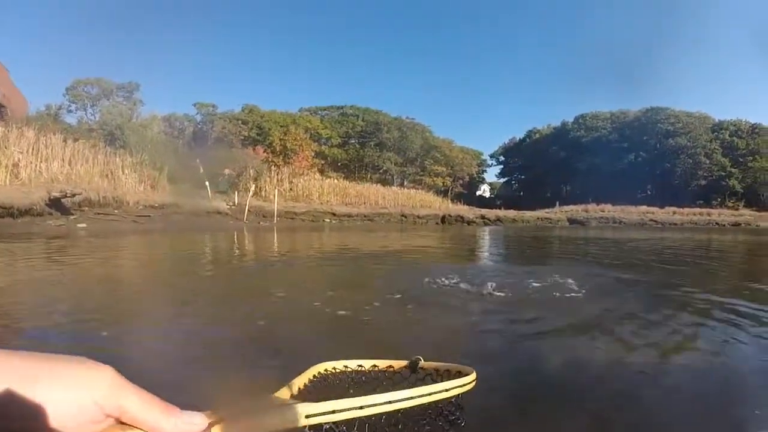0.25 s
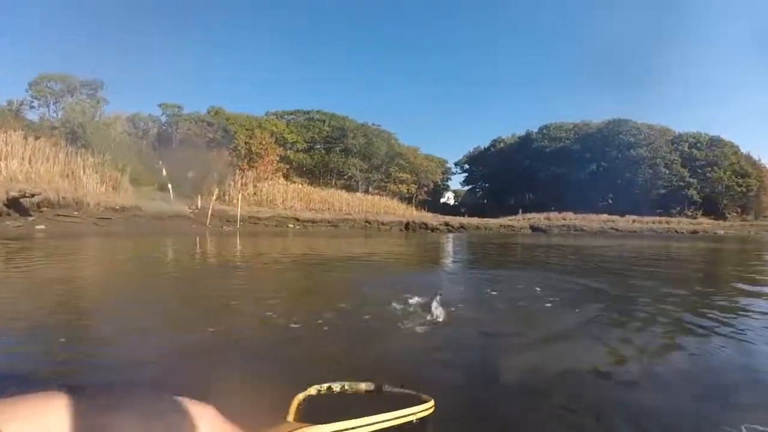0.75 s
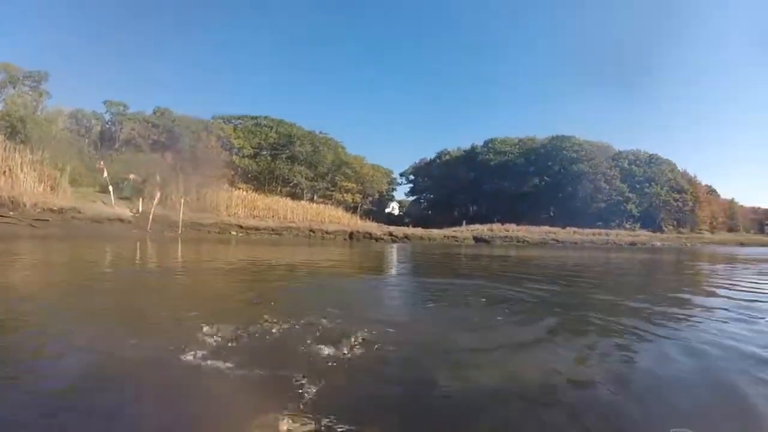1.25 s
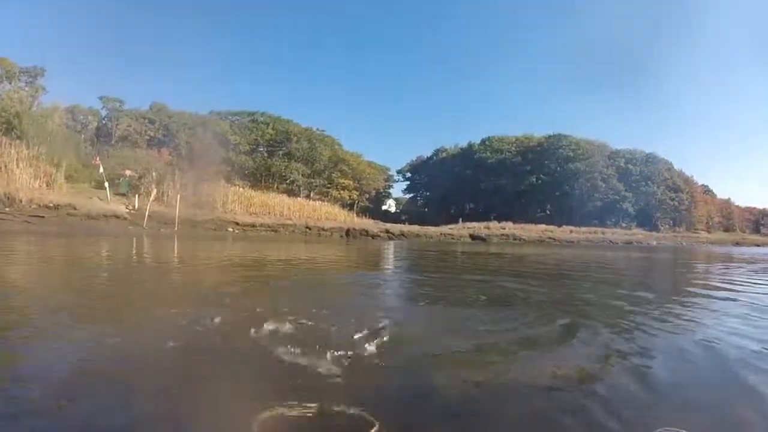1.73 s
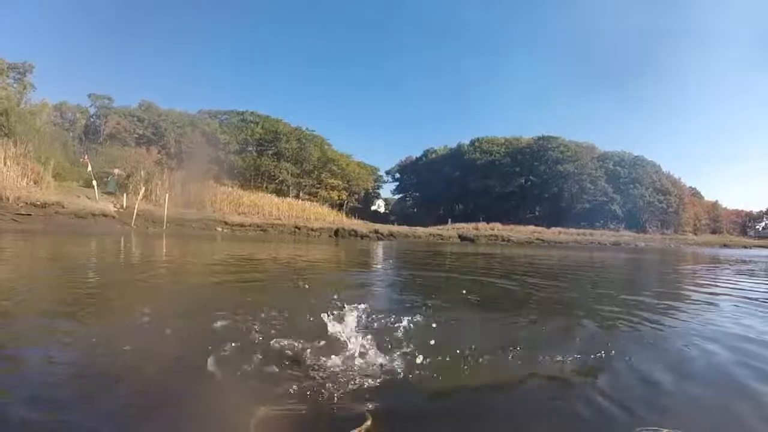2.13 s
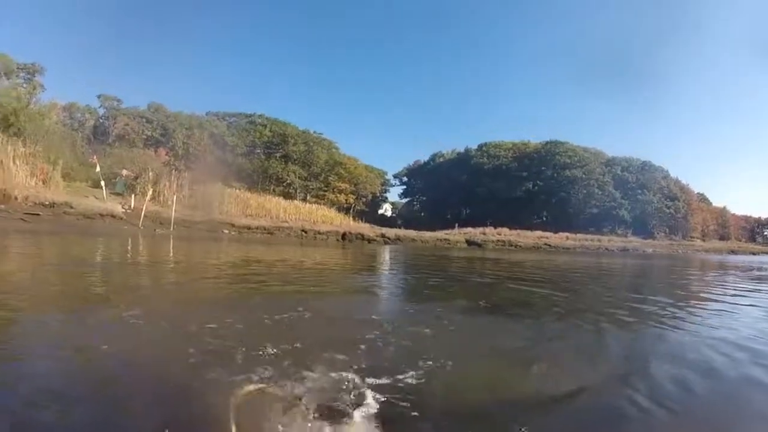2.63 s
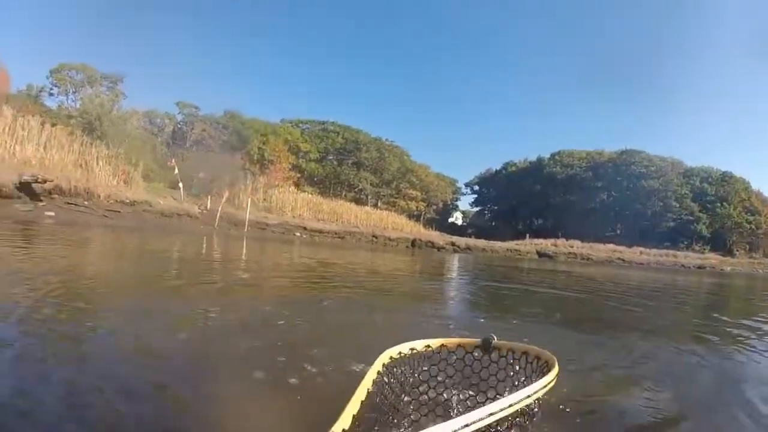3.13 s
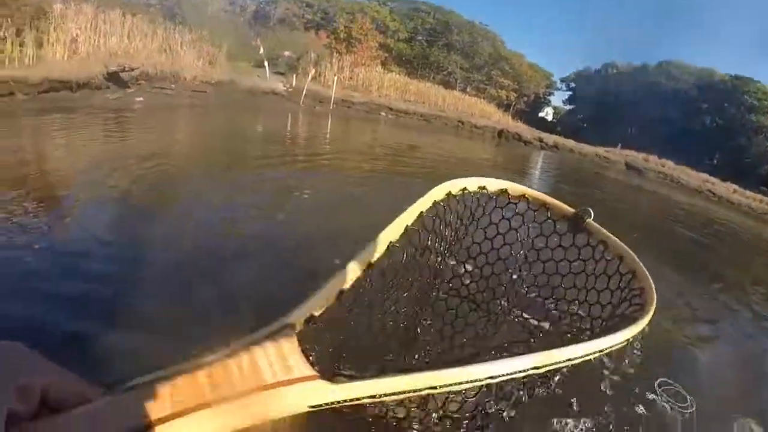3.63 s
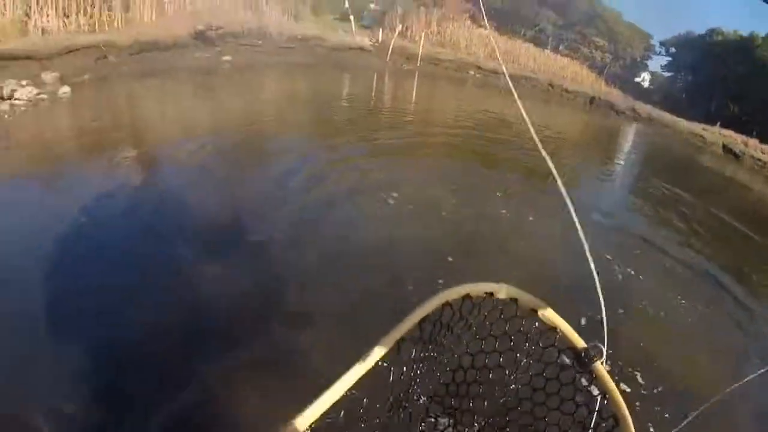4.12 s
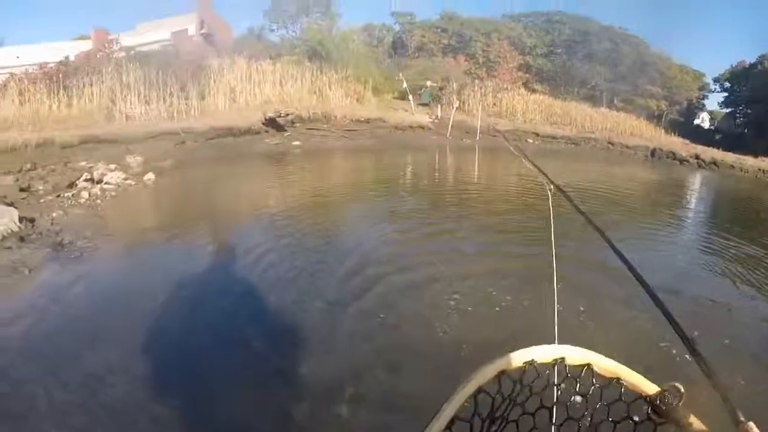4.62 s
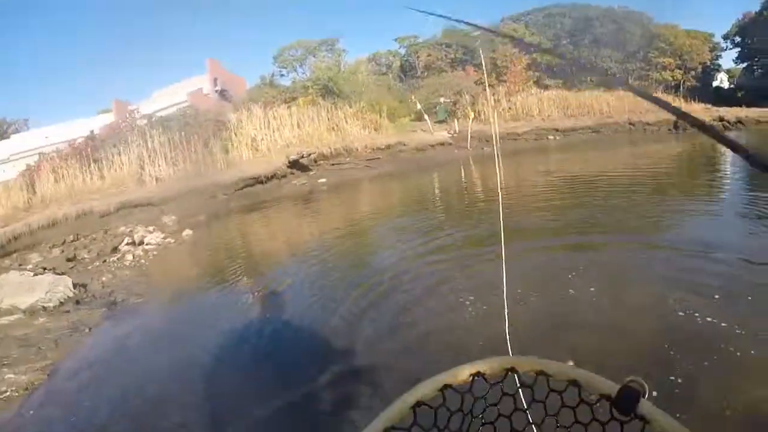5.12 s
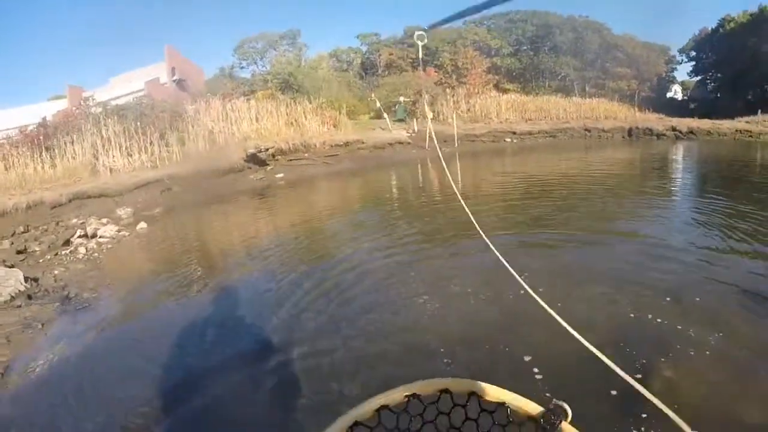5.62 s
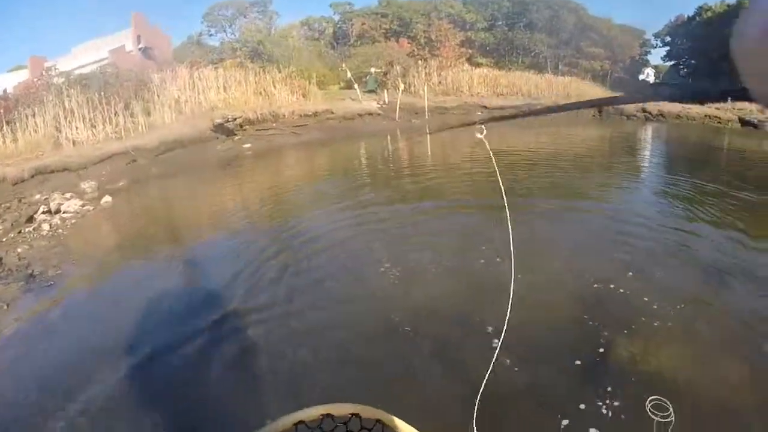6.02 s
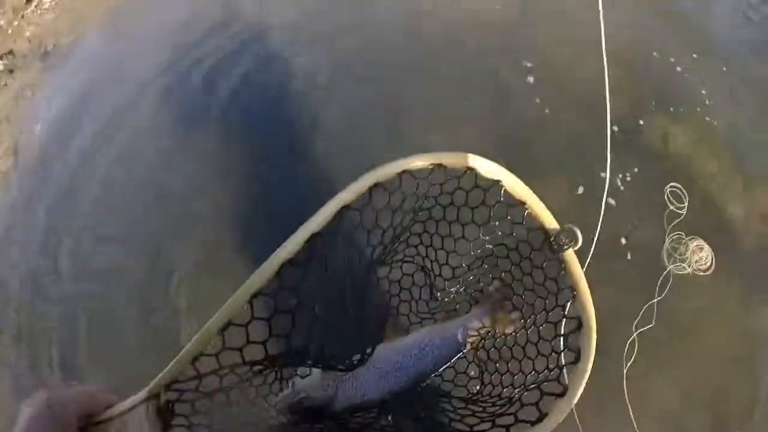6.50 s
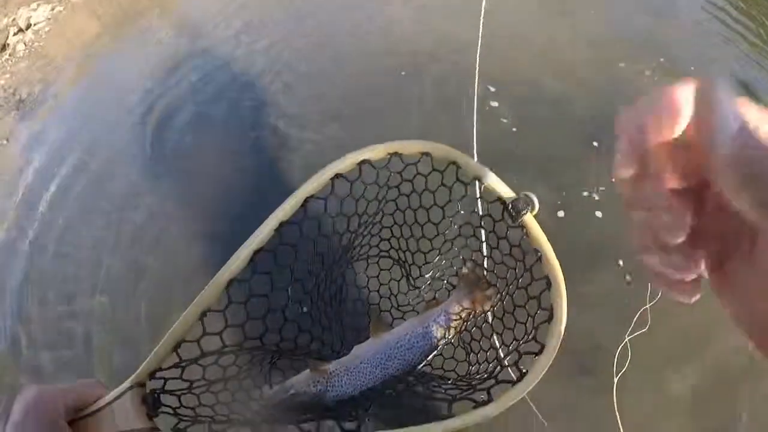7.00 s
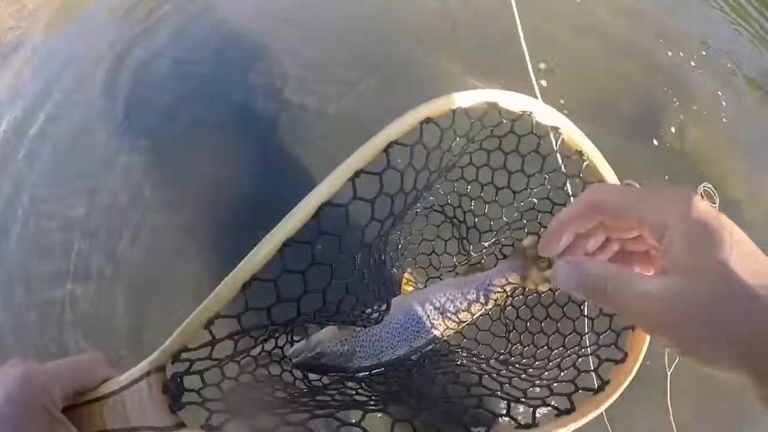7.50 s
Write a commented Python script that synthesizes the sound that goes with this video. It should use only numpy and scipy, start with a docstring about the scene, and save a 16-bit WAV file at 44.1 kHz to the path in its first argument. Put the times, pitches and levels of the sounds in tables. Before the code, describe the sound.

Close, boxy and muffled sound from a camera case worn on the body. Short scrapes and bursts of splashing come first, with droplets and hollow bubbles, peaking in a sharp harsh slap. Heavier rustling and low bumps follow, then thinner rubbing. A cluster of loud, clipped plastic cracks and deep jolts comes late, with brief metallic ringing, before everything drops to soft handling noise and a faint hiss.

```python
"""Hooked fish thrashing by a camera in a case

A hooked fish thrashes in shallow water and is netted, heard by a body-worn camera in a plastic case.
Splashes and rubbing straps are random grains that ring the resonances of the case; drops are short sine plips.
Hard knocks late on drive the same resonances and overload the microphone; a metal latch rings after them.
Jolts are low damped waves. Wind and body movement are shaped low noise underneath."""
import sys
import numpy as np
from scipy import signal
from scipy.fft import rfft, irfft
from scipy.io import wavfile

SR = 44100
rng = np.random.default_rng(int(sys.argv[2]) if len(sys.argv) > 2 else 0)


def digitize_waveform(pressure):
    """Quantize a signal to 16-bit integers and store it at the path in sys.argv[1].

    Rows of a 2-D input are taken as channels; values are limited to [-1, 1].
    """
    field = np.atleast_2d(pressure).T
    bounded = np.clip(field, -1, 1)
    quanta = np.round(bounded * 32767).astype(np.int16)
    wavfile.write(sys.argv[1], SR, quanta)


def amplitude_ratio(level_db):
    """Convert a level in decibels to the matching linear amplitude (field) ratio."""
    exponent = np.asarray(level_db, float) / 20
    return 10 ** exponent


N = 341775  # length of the scene in samples


def rms_one(x):
    """Scales a sound to unit rms."""
    return x / np.sqrt(np.mean(x ** 2) + 1e-20)


def drift(rate_hz):
    """Slow random wandering with spread 1: noise smoothed by a double low-pass, made at SR / 20."""
    r = np.exp(-40 * np.pi * rate_hz / SR)
    noise = rng.standard_normal(N // 20 + 2002)
    slow = signal.lfilter([1], [1, -2 * r, r * r], noise)[2000:]  # skip the settling
    return np.interp(np.arange(N) / 20, np.arange(len(slow)), rms_one(slow))


def resonance(x, hz, width):
    """Two-pole resonance, width in Hz, with gain about 1 on top."""
    r = np.exp(-np.pi * width / SR)
    top = np.array([1, 0, -1]) * (1 - r * r) / 2
    bottom = [1, -2 * r * np.cos(2 * np.pi * hz / SR), r * r]
    return signal.lfilter(top, bottom, x)


def low_pass(x, order, hz):
    """Takes away what lies above hz; a higher order cuts more steeply."""
    return signal.sosfilt(signal.butter(order, hz, fs=SR, output="sos"), x)


def ringing(hz, t60):
    """A sine that starts at height 1 and dies by 60 dB in t60 seconds."""
    t = np.arange(int(t60 * SR)) / SR
    return np.sin(2 * np.pi * hz * t) * amplitude_ratio(-60 * t / t60)


def add(out, s, sound):
    """Mixes a sound in at s seconds."""
    at = round(s * SR)
    out[at:at + len(sound)] += sound[:N - at]


def grains(per_s, spread_db):
    """Random clicks of uneven size and either sign, scaled to unit rms."""
    sizes = amplitude_ratio(spread_db * np.minimum(rng.exponential(1, N), 5)) * rng.choice([-1, 1], N)
    happens = rng.random(N) < per_s / SR
    return rms_one(sizes * happens)


def swells(bed_db, s, peak_db, rise_s, fall_s):
    """Level in dB of a background bed plus swells that rise to a peak and fall; their powers add."""
    roundness = 0.85  # 1: even fall in dB; less: sharper top and flatter feet
    t = np.arange(0, N, 32)
    late = t / SR - s[:, None]
    away = np.where(late < 0, -late / rise_s[:, None], late / fall_s[:, None])  # 1 is 20 dB down
    swell_db = peak_db[:, None] - 20 * away ** roundness
    power = amplitude_ratio(2 * bed_db[t]) + np.sum(amplitude_ratio(2 * swell_db), axis=0)
    return np.interp(np.arange(N), t, 10 * np.log10(power))


# background level of rub, spray and rumble; it sinks after the hard knocks, then recovers:
# (t/s, rub level/dB, spray level/dB, deep rumble level/dB, upper rumble level/dB)
BACKGROUND_LEVELS = [(0.0, -64.5, -63.5, -55, -64), (0.2, -63, -63, -64, -56.5),
                     (0.9, -62.5, -63, -41, -53), (1.5, -62, -63.5, -45, -57.5), (2.4, -59, -59, -49, -48),
                     (3.05, -59, -57.5, -53, -56.5), (3.3, -52, -59.5, -35.5, -44.5),
                     (4.0, -51, -55, -31, -37), (4.25, -50, -58, -28, -45),
                     (4.55, -77.5, -62.5, -37.5, -46), (5.4, -59.5, -59, -45.5, -60),
                     (5.92, -56.5, -64.5, -39, -45), (5.99, -65, -81.5, -35.5, -49),
                     (6.29, -65.5, -86, -39, -50), (6.5, -65, -86, -41, -60.5),
                     (6.78, -83, -85, -73, -72.5), (7.25, -72, -70, -64.5, -62.5),
                     (7.55, -67, -67, -46.5, -74), (7.75, -59, -59.5, -44, -38)]


def background_levels():
    """The four background levels, drawn as straight lines from point to point, sample by sample."""
    s, *columns = np.transpose(BACKGROUND_LEVELS)
    return [np.interp(np.arange(N) / SR, s, column) for column in columns]


# resonances of the case, before each sound sets its own tilt and widening:
# (f/Hz, basic width/Hz, relative level/dB)
CASE_MODES = [(390, 266, -0.5), (750, 133, 0.5), (957, 166, -1.5), (1388, 277, -0.5), (2044, 261, -3),
              (2471, 355, -4.5), (2955, 210, -10), (3360, 480, -17.5), (4360, 730, -19.5), (5725, 770, -23),
              (7370, 1100, -32.5), (8600, 700, -42.5), (9300, 1100, -40), (12000, 4700, -51)]


def through_case(force, modes, tilt_db):
    """A force rings steep-sided case resonances, each wavering a little; unit rms in, about unit rms out."""
    out, passed = np.zeros(N), 0
    for k, (hz, width, mode_db) in enumerate(modes):
        level_db = mode_db + tilt_db * np.log2(hz / 2000)  # tilt in dB per octave
        passed += amplitude_ratio(2 * level_db) * np.pi * width / SR
        once = resonance(force, hz, 1.25 * width)
        twice = resonance(once, hz, 1.25 * width)  # two in a row give steep sides
        out += (-1) ** k * amplitude_ratio(level_db + 1.8 * drift(6)) * twice
    return out / np.sqrt(passed)


# rubs and splashes, as peak levels of the driving grains; rise and fall are times over 20 dB:
# (t/s of peak, rub level/dB, dull part level/dB relative to rub, spray level/dB, rise/s, fall/s)
RUBS_AND_SPLASHES = [(.42, -43, -3.5, -70, 0.19, 0.19), (.51, -37, -3, -67, 0.041, 0.045),
                     (0.611, -35, 1.5, -60, 0.064, 0.095), (.70, -36, 4.5, -60, 0.13, 0.043),
                     (.84, -54, -0.5, -63, 0.41, 0.27), (1.05, -53, 4.5, -62, 0.055, 0.27),
                     (1.27, -51.5, -0.5, -53.5, .35, 0.22), (1.437, -51, 1, -52.5, 0.021, .06),
                     (1.558, -60, -11, -56.5, 0.011, 0.32), (1.811, -55.5, 5, -47, 0.066, .03),
                     (1.86, -57, 9, -58, .03, 0.18), (2.01, -41, -5.5, -46, 0.056, 0.16),
                     (2.164, -51, 3, -53.5, 0.29, 0.23), (2.568, -50.5, 1.5, -57, 0.25, 0.015),
                     (2.628, -42, 0.5, -52.5, 0.037, 0.33), (2.718, -23, -9.5, -46, 0.042, 0.096),
                     (2.75, -25, -11, -55, 0.061, 0.048), (2.845, -45, -5, -62, 0.13, 0.015),
                     (2.977, -36.5, 1.5, -55, 0.04, 0.014), (3.146, -45, -24, -55, 0.015, 0.084),
                     (3.4, -41.5, -4, -74, 0.19, 0.046), (3.498, -30.5, -3, -62, 0.018, 0.0092),
                     (3.56, -36, -4, -55, 0.1, 0.19), (3.77, -32, -6, -45, .3, 0.19),
                     (3.89, -34.5, -0.5, -46, 0.2, 0.14), (4.244, -53.5, -11, -64, 0.032, 0.87),
                     (4.35, -32, -1, -50, .2, 0.17), (4.44, -34, -5, -48, 0.29, 0.061),
                     (4.711, -56.5, 11.5, -51.5, 0.11, 0.027), (4.78, -45, 2.3, -57, 0.03, 0.1),
                     (5.022, -43.5, 1.5, -49, 0.14, 0.04), (5.078, -47.5, 1.5, -53.5, 0.075, 0.26),
                     (5.5, -38, -3.5, -52.5, 0.052, 0.095), (5.6, -45, -6, -48.5, 0.031, 0.088),
                     (5.638, -50, -9, -49.5, 0.056, 0.016), (5.738, -51.5, -7, -54, 0.12, 0.064),
                     (5.828, -49, -6.5, -53.5, 0.032, 0.22), (6.078, -39.5, -20, -52, 0.032, 0.019),
                     (6.178, -43.5, -2.5, -50.5, 0.31, 0.066), (6.265, -43.5, 1.5, -57, 0.12, 0.022),
                     (6.363, -49, 3.5, -54.5, .12, 0.066), (6.408, -45.5, -1.5, -48.5, 0.012, 0.014),
                     (6.569, -44, -7.5, -52.5, .034, 0.13), (6.67, -50.5, 2, -56.5, 0.056, 0.038),
                     (7.266, -56, -8, -70, 0.019, .021), (7.306, -56, -4, -65, 0.037, 0.034),
                     (7.383, -51.5, -2.5, -64, .013, .03), (7.442, -57, 0.5, -60.5, 0.079, 0.072),
                     (7.567, -55.5, 8.5, -74, 0.038, .021), (7.708, -62, -3, -50, .005, 0.018)]


def rubs_and_splashes():
    """Rubs and splashes swell over a faint, changing background of rubbing and spray, and set the level of the
    droplets too."""
    bed_rub_db, bed_spray_db, _, _ = background_levels()
    s, peak_db, dull_db, spray_peak_db, rise, fall = np.transpose(RUBS_AND_SPLASHES)
    rub_db = swells(bed_rub_db, s, peak_db, rise, fall)
    bed_dull_db = bed_rub_db + 3  # the faint rubbing has a stronger dull part
    dull_re_rub_db = swells(bed_dull_db, s, peak_db + dull_db, rise, fall) - rub_db
    spray_db = swells(bed_spray_db, s, spray_peak_db, rise, fall)
    return rub(rub_db, dull_re_rub_db) + spray(spray_db) + droplets(spray_db, rub_db)


# slips and slaps within the rub, as strength of the driving grains; they die to 1/e in the decay time:
# (t/s, starting level/dB, decay/ms)
RUB_SLIPS = [(0.5553, -31.5, 5.5), (0.665, -37.5, 8.7), (0.732, -45, 2.4), (1.233, -53, 3.3),
             (1.6, -48, 2.3), (1.652, -63, 2.6), (2.336, -66, 2.3), (2.224, -49, 2.8), (2.567, -45, 4.2),
             (2.941, -44, 6), (2.8035, -41, 15), (3.1384, -50, 6.4), (3.245, -49, 10), (3.495, -42, 8.5),
             (4.0438, -29.5, 1.8), (4.1, -40, 4.4), (4.2299, -39, 12), (4.298, -34, 4), (4.339, -54, 9.1),
             (5.2741, -43, 3.2), (6.895, -62, 2.8), (7.008, -62, 6)]


def rub(level_db, dull_db):
    """Dense grains of straps rubbing shake the case; the dull level sets the share of its low resonances."""
    strength = amplitude_ratio(level_db + 2.0 * drift(18) + 1.3 * drift(100))
    t = np.arange(1500) / SR
    for s, db, ms in RUB_SLIPS:  # a slip is a sudden burst of the same grains
        add(strength, s, amplitude_ratio(db) * np.exp(-1000 * t / ms))
    force = grains(5000, spread_db=3.0) * strength
    upper = low_pass(through_case(force, CASE_MODES[4:], tilt_db=-6.0), 2, 6000)
    dull = through_case(force * amplitude_ratio(dull_db), CASE_MODES[:4], tilt_db=0.8)
    return upper + dull


def spray(level_db):
    """Fine bright grains of falling water, coloured by the upper resonances of the case."""
    force = grains(2000, spread_db=1.5) * amplitude_ratio(level_db + 2.2 * drift(50))
    return through_case(force, CASE_MODES[5:], tilt_db=8.0)


def plip(hz, cycles, rise):
    """A bubble swells in about a cycle, rings on unevenly and rises in pitch; peak about 1."""
    turns = np.arange(int(cycles * SR / hz)) * hz / SR
    uneven = 1 + 0.68 * np.interp(turns / 2.8, np.arange(30), rng.standard_normal(30))
    envelope = (1 - np.exp(-turns / 1.3)) * amplitude_ratio(-40 * turns / cycles)
    wave = envelope * np.sin(2 * np.pi * turns * (1 + rise * turns))
    return wave * uneven / np.max(np.abs(wave))


# single droplets: (t/s, approximate peak level/dB, starting f/Hz)
SMALL_DROPS = [(0.604, -36.5, 4340), (0.8576, -42.5, 6020), (1.0974, -47.5, 3900), (1.235, -38, 6000),
               (1.792, -51, 6060), (1.8123, -46, 6100), (1.9165, -49, 5930), (1.9654, -46, 6100),
               (1.9954, -45, 6100), (2.062, -41, 6000), (2.167, -49, 5940), (2.2618, -48, 6100),
               (2.3528, -46, 5980), (2.604, -45, 5660), (2.8035, -42, 4360), (2.8459, -43.5, 5900),
               (2.9272, -57, 3840), (3.026, -48, 5870), (3.196, -41.5, 8550), (3.6227, -43.5, 4270),
               (3.7075, -42, 4350), (3.7883, -35, 5860), (3.9352, -29, 5920), (4.163, -38, 5730),
               (4.2971, -44, 3460)]
# one bubble near the surface, rising fast: (t/s, approximate peak level/dB, starting f/Hz)
SURFACE_PLOP = (2.868, -40, 950)
# larger bubbles: (t/s, approximate peak level/dB, starting f/Hz)
LARGE_BUBBLES = [(1.234, -39.5, 2630), (1.437, -39.5, 2190), (1.563, -46, 1420), (1.654, -48, 2700),
                 (1.716, -40, 2410), (1.798, -40, 1390), (1.856, -36.5, 2340), (1.919, -43, 1440),
                 (2.226, -38.5, 2590), (2.265, -39, 2460), (2.399, -40, 1440), (2.567, -34.5, 2960),
                 (2.598, -46.5, 2390), (2.803, -29, 2440), (2.948, -34, 2000), (3.139, -41.5, 1020),
                 (4.044, -39, 1086), (4.097, -43, 1390), (4.228, -30, 1980), (5.08, -34, 1870),
                 (7.709, -39, 1390)]


def droplets(spray_db, rub_db):
    """Listed drops and bubbles ring as plips, over a patter of small ones that follows the spray and rub levels."""
    out = np.zeros(N)
    for s, db, hz in SMALL_DROPS:
        add(out, s, amplitude_ratio(db) * plip(hz, cycles=48.0, rise=0.00052))
    s, db, hz = SURFACE_PLOP
    add(out, s, amplitude_ratio(db) * plip(hz, cycles=39.0, rise=0.0127))
    for s, db, hz in LARGE_BUBBLES:
        add(out, s, amplitude_ratio(db) * plip(hz, cycles=38.0, rise=0.0019))
    for when, pitch, size in rng.random((900, 3)):  # patter as loud as the spray allows
        s = when * (N - 1) / SR
        db = spray_db[int(s * SR)] + 5.0 - 12.0 * size
        add(out, s, amplitude_ratio(db) * plip(800 * 12.0 ** pitch, cycles=19.0, rise=0.0039))
    for when, pitch, size in rng.random((500, 3)):  # patter as loud as the rub allows
        s = when * (N - 1) / SR
        db = rub_db[int(s * SR)] + 4.5 - 13.0 * size
        add(out, s, amplitude_ratio(db) * plip(1200 * 2.4 ** pitch, cycles=28.0, rise=0.0033))
    ticks = np.zeros(N)  # each listed drop and larger bubble starts with a tick
    for s, db, _ in SMALL_DROPS + LARGE_BUBBLES:
        ticks[round(s * SR)] = amplitude_ratio(db)
    return out + resonance(ticks, 3500, 5000)


# knocks on the case; hardness tilts the resonances about 2000 Hz, rattle is the share of noise in the contact:
# (t/s, peak level/dB, favoured f/Hz, contact/ms, hardness/dB per octave, rattle/0 to 1)
CASE_KNOCKS = [(5.5141, -1.5, 617, 3.64, -1, 0.42), (5.5159, -8.5, 1950, 3, 11.5, 0),
               (5.640, -23, 2020, 2.2, -2, 0.56), (5.941, -19.5, 2000, 2.7, 0, 0.76),
               (5.947, -19.5, 4210, 21.7, 1.5, 0.7), (6.0069, -8, 2160, 6.5, -4, 0.96),
               (6.0088, -8, 1370, 3.04, 5, 0.97), (6.051, -23, 2370, 0.51, 12.5, 0.2),
               (6.060, -25, 2300, 1.3, 5.5, 0.74), (6.070, -23, 2280, 1.4, 6.5, 0.85),
               (6.0744, -14, 2760, 1.34, 0.5, 0.5), (6.2217, 6, 2400, 1.6, 4.5, 0.78),
               (6.2233, 0, 1480, 1.8, 8, 0.15), (6.311, -32, 1035, 2, 2, 0.45),
               (6.3995, -15.5, 800, 1.35, 12, 0.9), (6.4003, -5.5, 1470, 1.62, 3, 0.21),
               (6.459, 2.5, 2690, 1.07, 7, 0.69), (6.462, -12.5, 1500, 0.45, 6, 0.4),
               (6.567, -42, 1500, 2.3, 6, 0), (6.686, 0, 2220, 1.6, 10.5, 0.38)]


def knocks():
    """A rattling contact drives the case, with extra weight near the struck spot's own pitch."""
    out = np.zeros(N)
    t = np.arange(3000) / SR
    for s, db, spot_hz, ms, hardness_db, rattle in CASE_KNOCKS:
        # firm contact, then a short and a faint longer tail
        contact = (t < ms / 1000) + 0.5 * np.exp(-t / 0.00032) + amplitude_ratio(-29) * np.exp(-t / 0.0024)
        noise = rng.standard_normal(3000)
        tone = np.exp(-t / 0.006) * np.sin(2 * np.pi * spot_hz * t)
        force = contact * (rattle * noise + (1 - rattle) * tone)
        blow = amplitude_ratio(-10) * resonance(force, spot_hz, 600)
        for k, (hz, width, mode_db) in enumerate(CASE_MODES):
            level_db = mode_db + hardness_db * np.log2(hz / 2000)
            blow += (-1) ** k * amplitude_ratio(level_db) * resonance(force, hz, width)
        blow = low_pass(blow, 2, 9500)  # the case wall dulls the top
        add(out, s, amplitude_ratio(db) * blow / np.max(np.abs(blow)))
    return out


# modes of the metal latch, before each hit sets its level and damping:
# (f/Hz, relative level/dB, undamped t60/s)
LATCH_MODES = [(1797, -6.5, 0.53), (1850, -1.5, 0.73), (2585, -5.5, 0.17), (2970, -29.5, 0.18)]
# knocks that set the latch ringing; tilt turns about 1850 Hz, damping divides t60:
# (t/s, level/dB, tilt/dB per octave, damping factor)
LATCH_STRIKES = [(5.515, -40.5, -1, 1.1), (6.008, -46, 0.5, 1.9), (6.223, -38, -8.5, 1.8),
                 (6.401, -47.5, 6, 2.9), (6.459, -44, 16, 1.3), (6.689, -38, 14, 2.73)]


def latch():
    """The metal latch rings on after hard knocks as dying sines; two close modes beat."""
    out = np.zeros(N)
    for s, db, tilt_db, damping in LATCH_STRIKES:
        for hz, mode_db, t60 in LATCH_MODES:
            level_db = db + mode_db + tilt_db * np.log2(hz / 1850)
            add(out, s, amplitude_ratio(level_db) * ringing(hz, t60 / damping))
    return out


# jolts of the whole camera, peak before the start is rounded; f is negative when the camera is pulled:
# (t/s, peak level/dB, swing f/Hz, t60/s)
CAMERA_JOLTS = [(0.258, -25.5, 36.5, 0.25), (1.746, -23.5, 43, 0.072), (1.702, -31, 205, 0.027),
                (2.706, -23.5, 257, 0.12), (2.735, -48, 292, 0.089), (3.235, -21, 56, 0.048),
                (3.491, -23, 50, 0.17), (3.699, -14, 108, 0.035), (4.099, -16.5, 93, 0.034),
                (4.154, -21, 252, .03), (4.202, -18, 200, 0.0087), (4.408, -16.5, 137.5, 0.087),
                (4.775, -25.5, 55, 0.15), (4.97, -31, 43, 0.46), (5.273, -19, 105, 0.012),
                (5.342, -26, 108.5, 0.091), (5.5146, -1, 277, 0.041), (5.524, -12, 136, 0.04),
                (5.9425, -9, -110, 0.024), (5.9446, 3, 79, 0.03), (5.963, -7, 110, 0.047),
                (6.007, -5.5, 57, 0.05), (6.2235, -4, 45, 0.0073), (6.281, -10.5, 82, 0.046),
                (6.399, 3.5, 48, 0.0071), (6.427, -18.5, 107, 0.069), (6.6873, -9.5, 60, 0.006),
                (7.058, -39.5, 60.5, 0.048), (7.354, -36, 46, 0.058), (7.435, -31, 44, 0.066),
                (7.557, -29, 120, 0.02)]


def jolts():
    """The camera is pushed and swings back: a low damped wave, its start rounded by a low-pass."""
    out = np.zeros(N)
    for s, db, hz, t60 in CAMERA_JOLTS:
        swing = ringing(hz, t60)
        add(out, s, amplitude_ratio(db) * swing / np.max(np.abs(swing)))
    return low_pass(out, 2, 900)


# gusts and body movements; rise and fall are times over 20 dB:
# (t/s of peak, deep rumble level/dB, upper rumble level/dB, rise/s, fall/s)
GUSTS_AND_MOVES = [(.26, -32, -62, 0.096, .1), (.4, -58, -42.5, 0.14, 0.2), (.54, -36.5, -43, .13, 0.34),
                   (.73, -57, -35.5, 0.36, 0.085), (.9, -34.5, -51, 0.26, 0.091),
                   (1.07, -38.5, -42, 0.15, 0.82), (1.49, -37, -54, .2, 0.079),
                   (1.75, -41.5, -47.5, 0.13, 0.59), (2.06, -38, -37, 0.11, 0.38),
                   (2.23, -31.5, -59, 0.37, 0.029), (2.33, -31, -86, 0.06, 0.23),
                   (2.58, -34, -41.5, 0.091, 0.43), (2.73, -25, -41, .1, 0.21),
                   (2.958, -27.5, -44.5, 0.15, 0.095), (3.12, -32, -54, 0.11, 0.39),
                   (3.27, -35, -39.5, 0.22, 0.42), (3.71, -26, -32, 0.03, 0.26),
                   (3.84, -43, -35, 0.13, 0.42), (3.97, -23, -38, 0.26, 0.32),
                   (4.428, -24, -21.5, 0.22, 0.049), (4.8, -35, -41, .4, 0.074),
                   (4.99, -18.5, -35.5, 0.22, 0.43), (5.42, -28, -47, 0.25, 0.08),
                   (5.57, -33, -35, .15, 0.27), (5.67, -26.5, -49.5, 0.16, .15),
                   (6.04, -27.5, -32.5, 0.16, 0.039), (6.078, -19, -49.5, 0.13, 0.088),
                   (6.171, -25.5, -34, .2, 0.12), (6.326, -27, -43.5, .07, .03),
                   (6.37, -37.5, -44.5, 0.037, 0.24), (6.59, -37, -57.5, 0.073, 0.38),
                   (7.08, -54.5, -55, 0.048, .07), (7.27, -44, -62, 0.19, 0.26),
                   (7.37, -48.5, -46.5, 0.11, .3), (7.56, -39, -45.5, .06, .3),
                   (7.71, -31.5, -54.5, 0.26, 0.14)]


def gusts_and_moves():
    """Gusts and body movements swell over the background level and set the level of the rumble."""
    _, _, bed_deep_db, bed_upper_db = background_levels()
    s, gust_deep_db, gust_upper_db, rise, fall = np.transpose(GUSTS_AND_MOVES)
    deep_db = swells(bed_deep_db, s, gust_deep_db, rise, fall)
    upper_db = swells(bed_upper_db, s, gust_upper_db, rise, fall)
    return rumble(deep_db, upper_db)


# spectrum of the rumble, a shape only: (f/Hz, relative level/dB)
RUMBLE_SHAPE = [(12, -36.5), (20, 14.5), (54, 4.5), (118, -2.5), (220, -11), (269, -8), (334, -21),
                (443, -25), (500, -33.5), (650, -41.5), (1100, -120)]


def rumble(deep_db, upper_db):
    """Lumpy low noise of wind on the case and body movement, in parts that cross over near 110 Hz."""
    hz = np.arange(N // 2 + 1) * SR / N + 0.00091  # kept above 0 for the logarithm
    shape_hz, shape_db = np.transpose(RUMBLE_SHAPE)
    shape = amplitude_ratio(np.interp(np.log(hz), np.log(shape_hz), shape_db))
    deep_share = 1 / (1 + (hz / 110) ** 4)
    deep = rms_one(irfft(rfft(rng.standard_normal(N)) * shape * deep_share, N))
    upper = rms_one(irfft(rfft(rng.standard_normal(N)) * shape * (1 - deep_share), N))
    lumps_db = 2.5 * drift(10)
    flutter_db = 2.23 * drift(39)
    return amplitude_ratio(deep_db + lumps_db) * deep + amplitude_ratio(upper_db + lumps_db + flutter_db) * upper


def scene():
    """All sources summed at the microphone, as one channel."""
    return (rubs_and_splashes() + knocks() + latch() + jolts() + gusts_and_moves())[None]


def band_limit(x):
    """A steep low-pass at the top of the band."""
    return signal.sosfilt(signal.butter(12, 16460, fs=SR, output="sos"), x)


def record(dry):
    """The microphone cuts bass, adds faint hiss, overloads hard and rolls off the treble."""
    x = signal.sosfilt(signal.butter(1, 34, "high", fs=SR, output="sos"), dry)
    hiss = signal.lfilter([1], [1, -0.7], rng.standard_normal(dry.shape))  # weaker in the treble
    x = x + amplitude_ratio(-83.5) * hiss
    ceiling = 0.97  # loud peaks flatten towards this height
    x = x / (1 + np.abs(x / ceiling) ** 10) ** 0.1
    x = low_pass(x, 4, 15000)
    return band_limit(x)


dry = scene()
out = record(dry)
digitize_waveform(out)
```